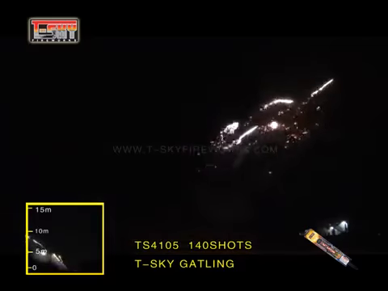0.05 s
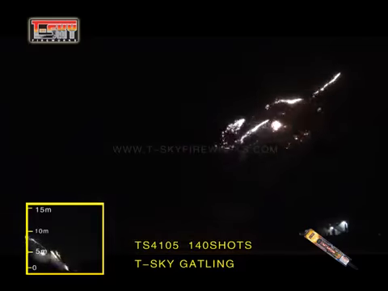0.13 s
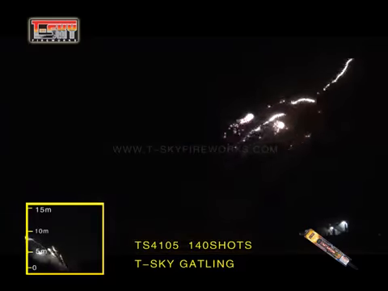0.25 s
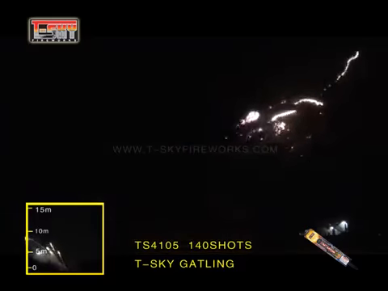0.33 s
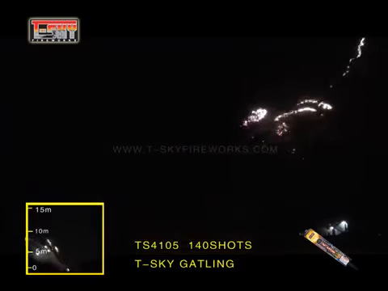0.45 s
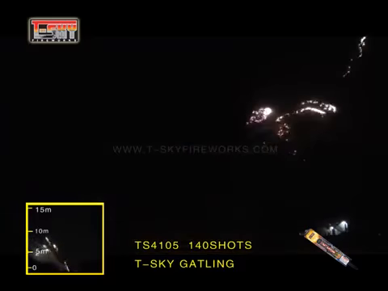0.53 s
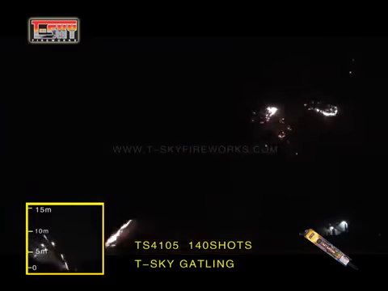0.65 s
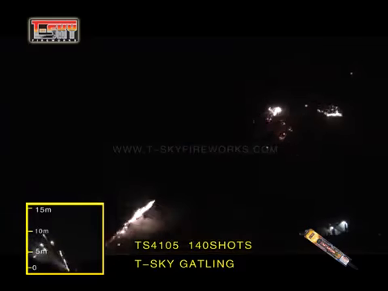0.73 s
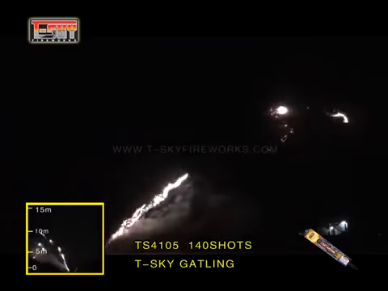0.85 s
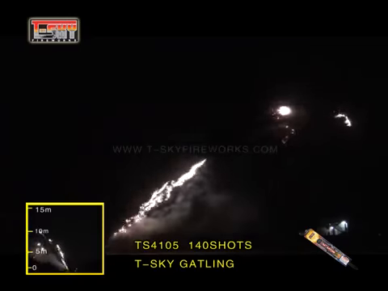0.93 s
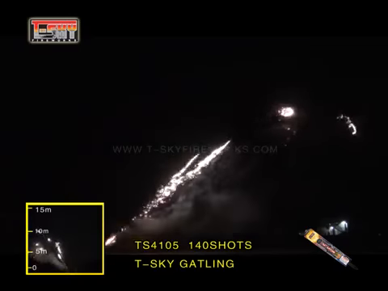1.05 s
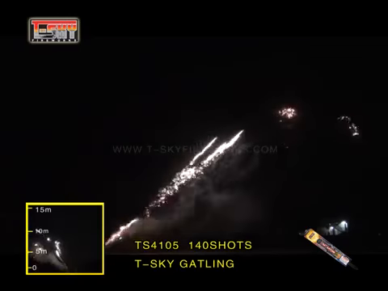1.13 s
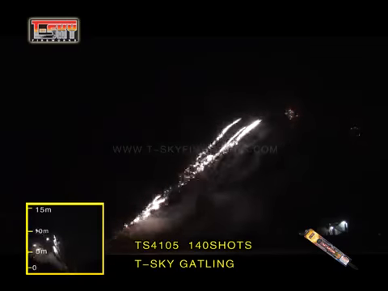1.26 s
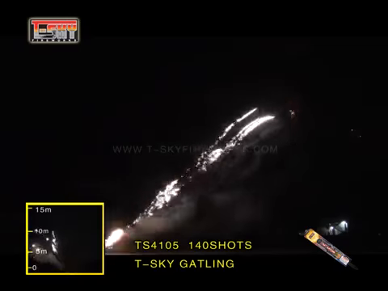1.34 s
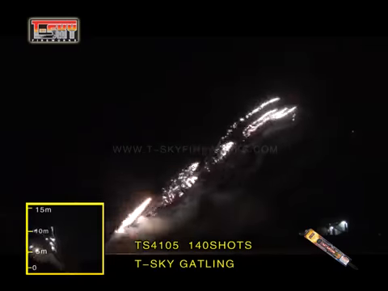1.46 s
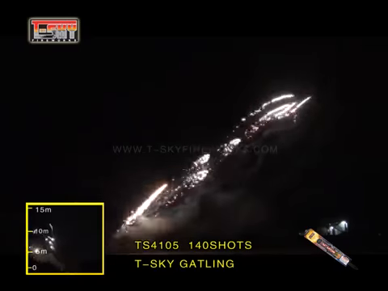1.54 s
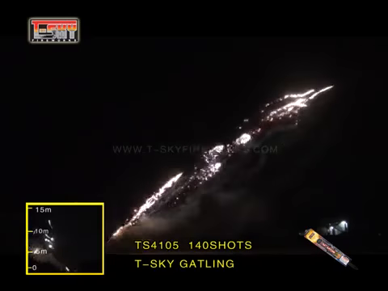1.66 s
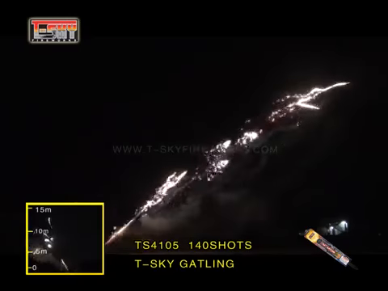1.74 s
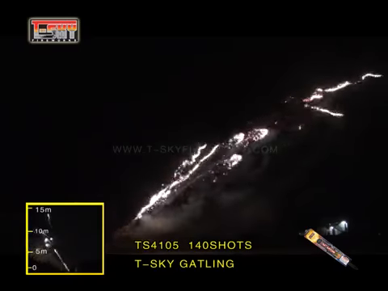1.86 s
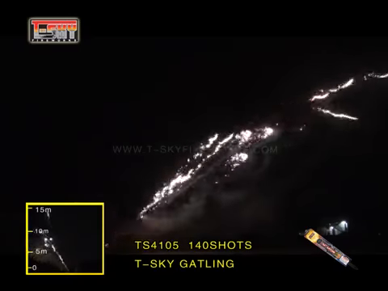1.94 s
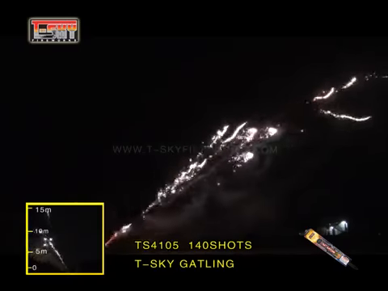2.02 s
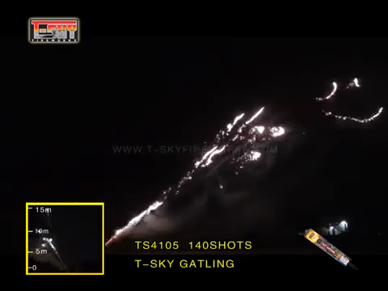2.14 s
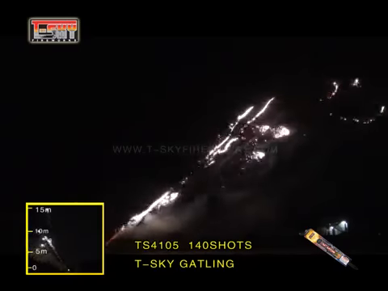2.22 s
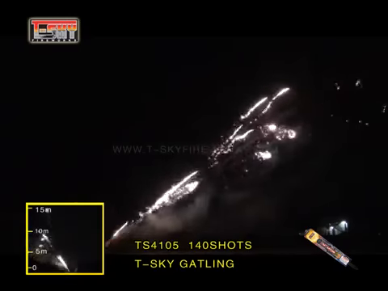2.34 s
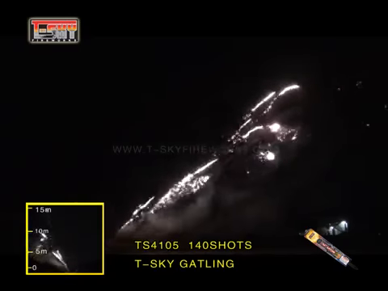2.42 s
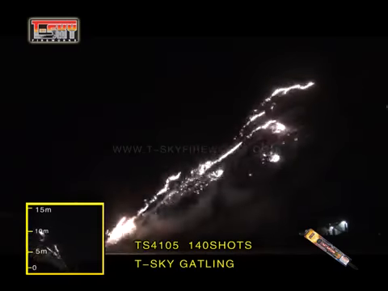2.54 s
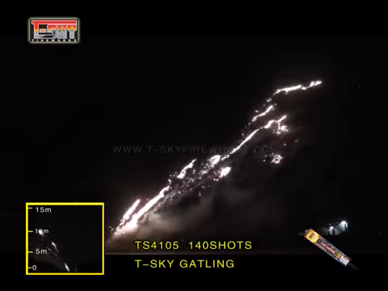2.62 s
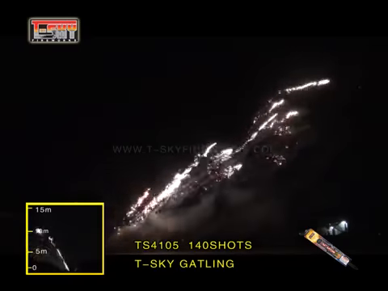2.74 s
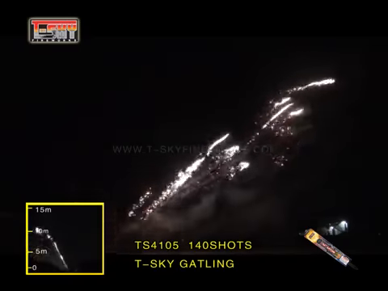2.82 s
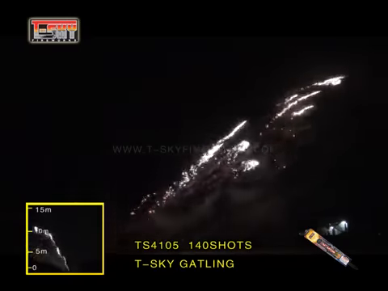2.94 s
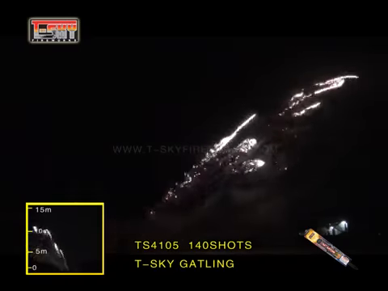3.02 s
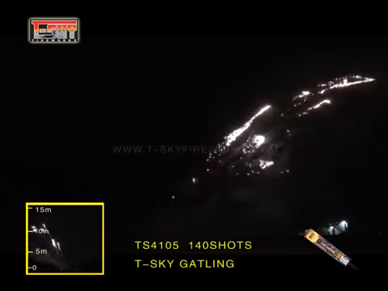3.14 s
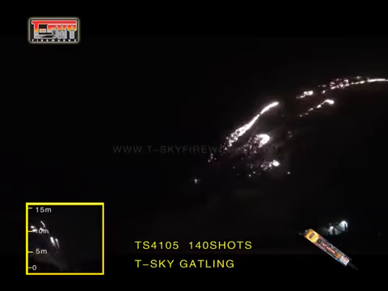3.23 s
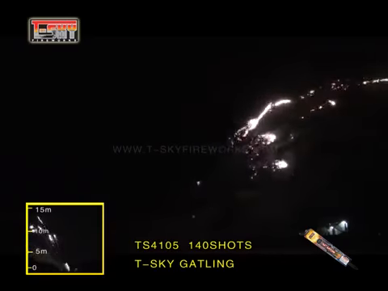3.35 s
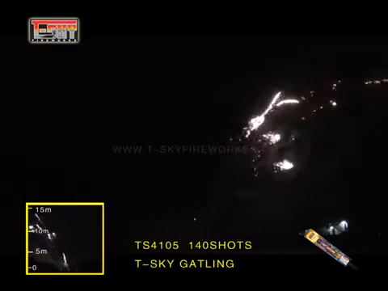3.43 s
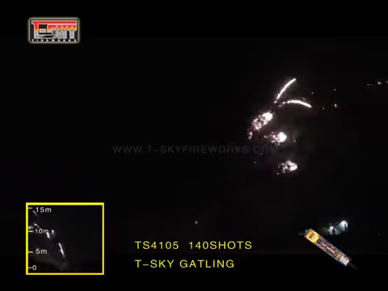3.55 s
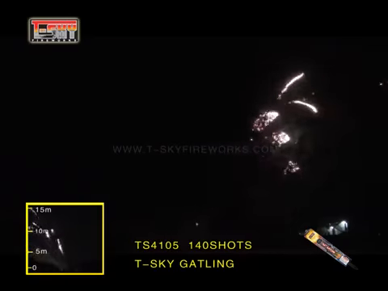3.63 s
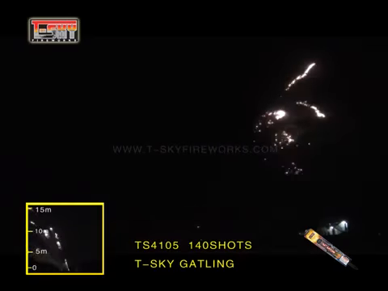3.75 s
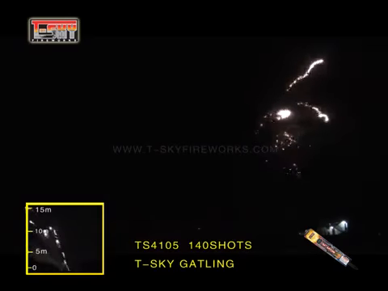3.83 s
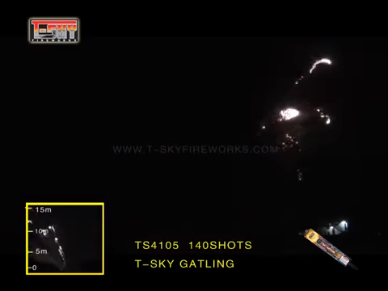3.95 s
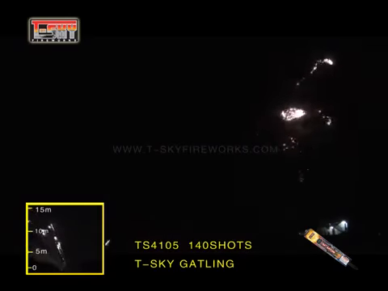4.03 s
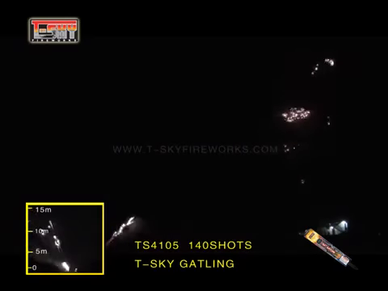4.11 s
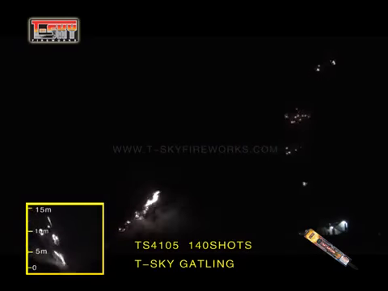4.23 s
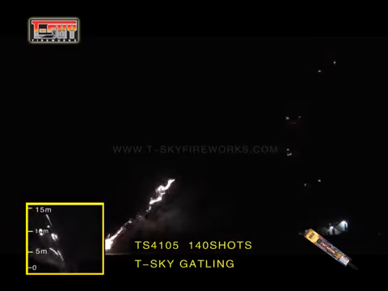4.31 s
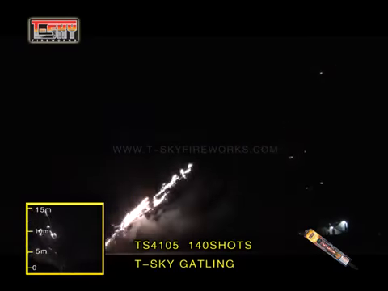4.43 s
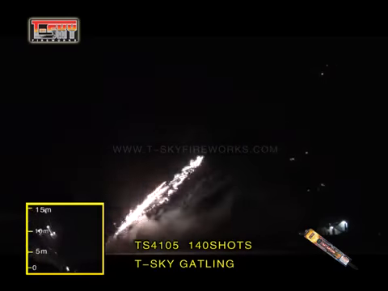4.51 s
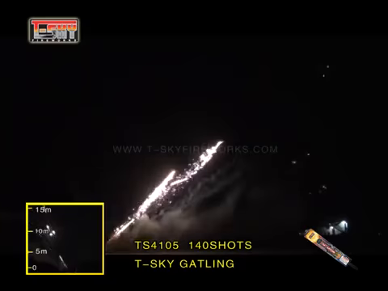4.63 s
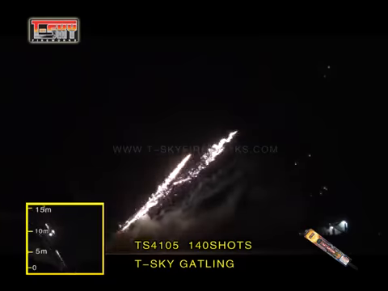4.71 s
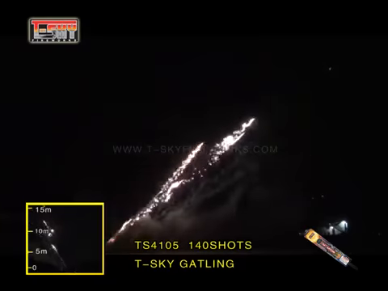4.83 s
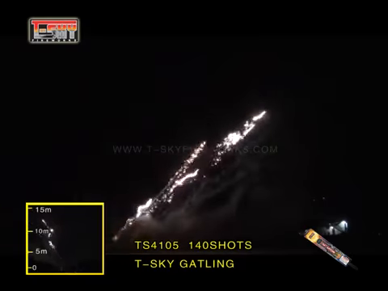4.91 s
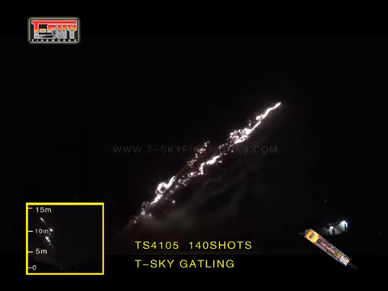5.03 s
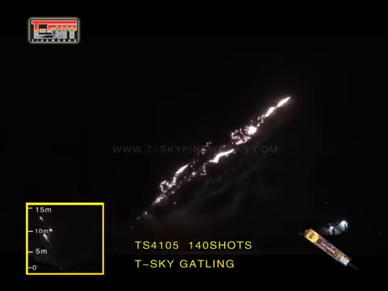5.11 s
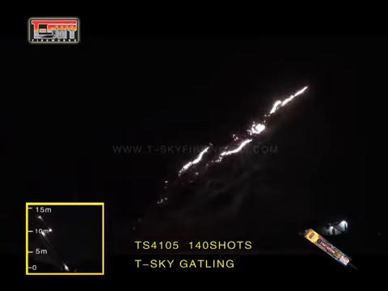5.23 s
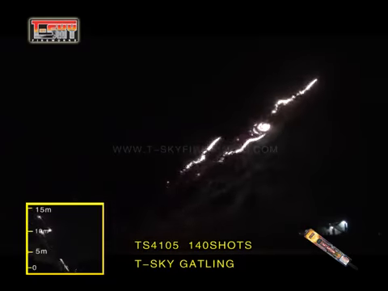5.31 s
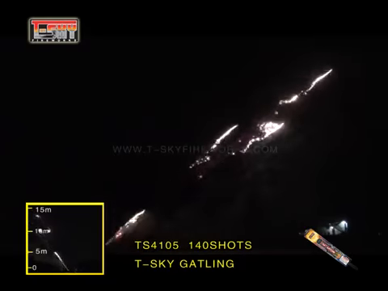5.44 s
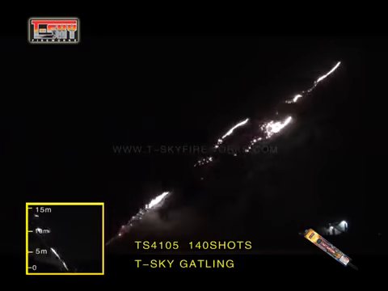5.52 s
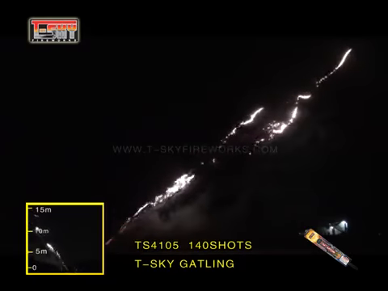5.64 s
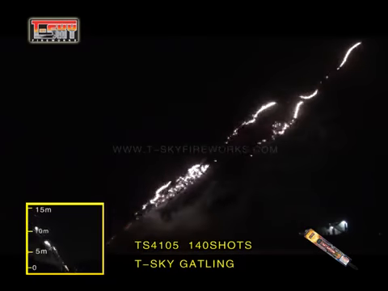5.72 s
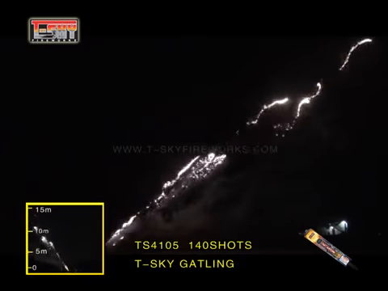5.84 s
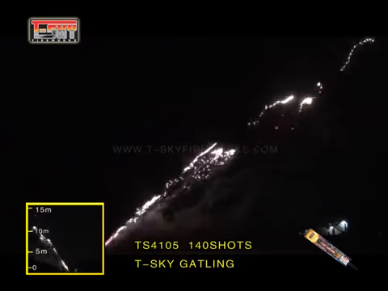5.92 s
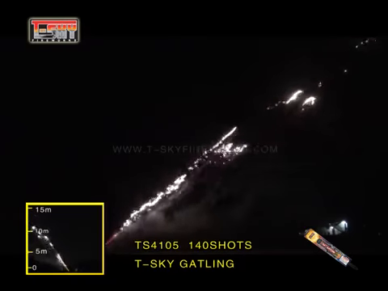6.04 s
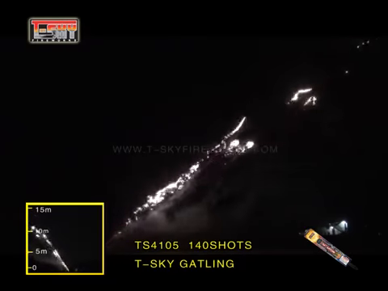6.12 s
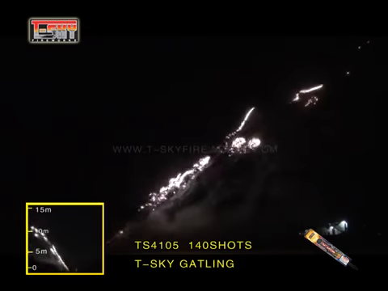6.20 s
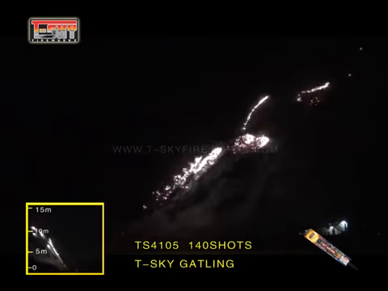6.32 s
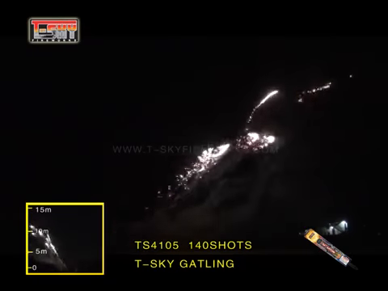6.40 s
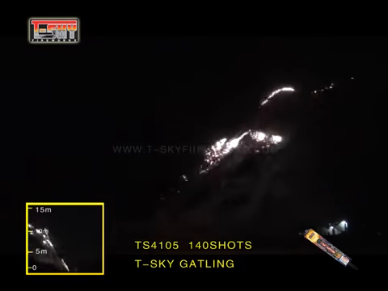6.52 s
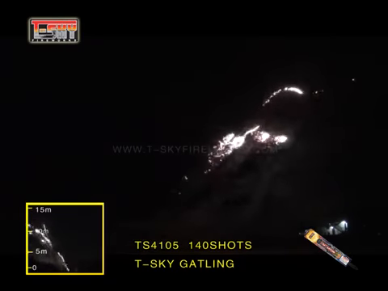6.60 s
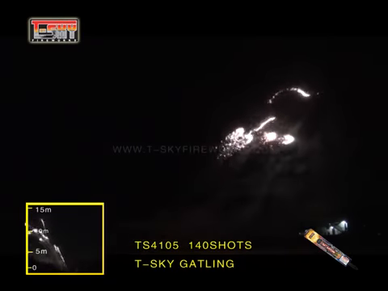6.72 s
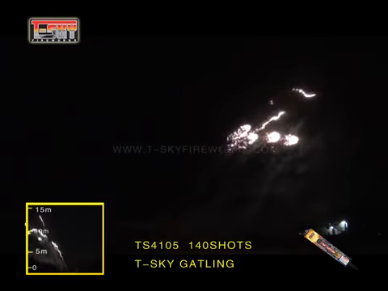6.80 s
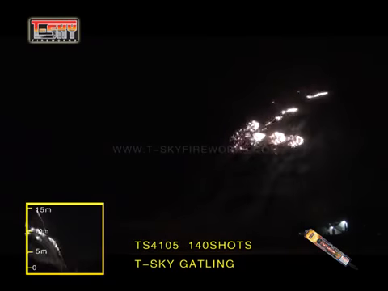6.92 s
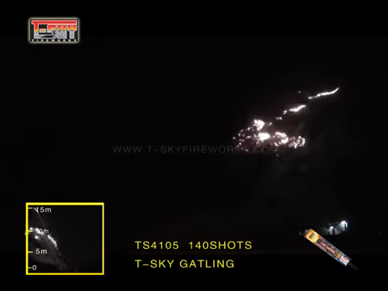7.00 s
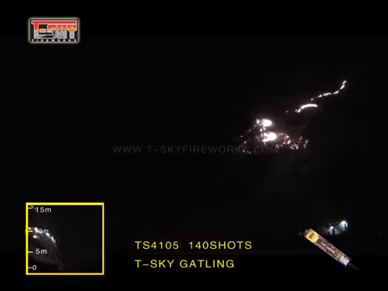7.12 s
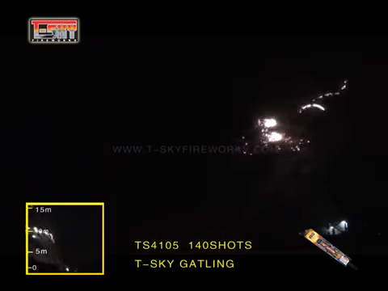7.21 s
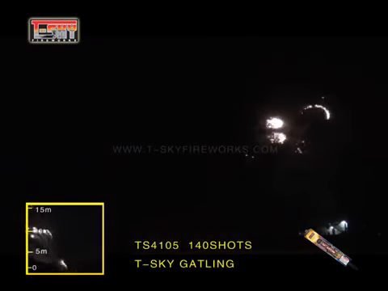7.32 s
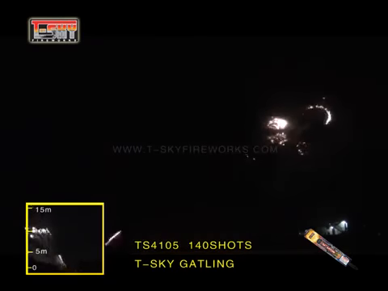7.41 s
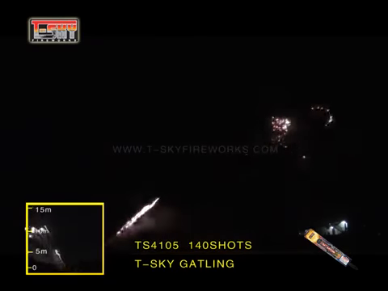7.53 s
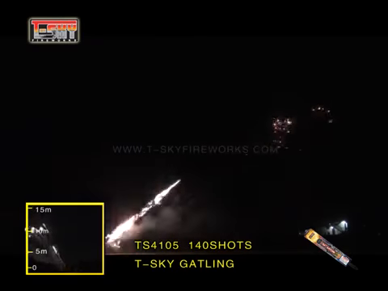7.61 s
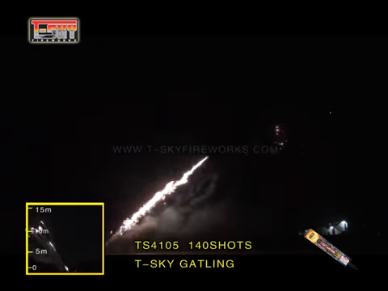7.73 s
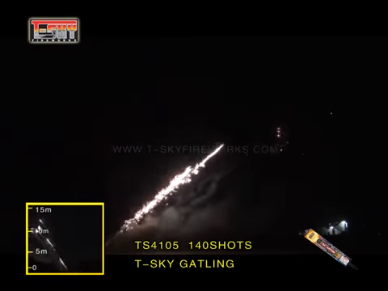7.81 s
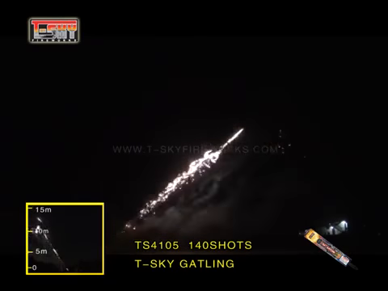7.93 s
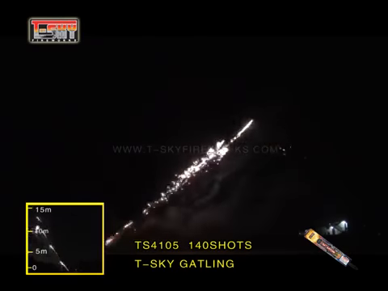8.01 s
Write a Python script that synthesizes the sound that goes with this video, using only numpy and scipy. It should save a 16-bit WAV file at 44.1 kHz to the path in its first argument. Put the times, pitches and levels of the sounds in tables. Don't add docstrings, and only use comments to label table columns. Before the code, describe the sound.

Whistling stars already in the air drift and fall in pitch, then a tight volley of loud cracks launches fresh ones that rush up and sink, each with a rougher twin. Bursts of pops come and go, with a lull around three to four seconds and another near seven, when only whistles remain. Light sparks, fading ground rumble and very faint wind surround a close, slightly dull, limited small microphone in an open field.

```python
import sys
import numpy as np
from scipy import signal
from scipy.fft import rfft, irfft, next_fast_len
from scipy.io import wavfile
from scipy.ndimage import uniform_filter1d, minimum_filter1d, map_coordinates

SR = 44100
rng = np.random.default_rng(int(sys.argv[2]) if len(sys.argv) > 2 else 0)


def gain_from_db(level_db):
    decades = np.asarray(level_db, float) / 20
    return 10 ** decades


def materialize(psi):
    bounded = np.clip(np.atleast_2d(psi).T, -1, 1)
    quanta = np.round(bounded * 32767).astype(np.int16)
    wavfile.write(sys.argv[1], SR, quanta)


N = 355442
TOP_HZ = 14950


def unit(x):
    return x / np.sqrt(np.mean(x ** 2) + 1e-20)


def along(points, hz):
    f, v = np.transpose(points)
    return np.interp(np.log(hz + 1), np.log(f + 1), v)


def wobble(rate, size, order=3):
    knots = rng.standard_normal(int(size * rate / SR) + 4)
    return map_coordinates(knots, [np.arange(size) * rate / SR], order=order)


def filtered(x, response):
    m = next_fast_len(N + SR // 2)
    return irfft(rfft(x, m) * response(np.fft.rfftfreq(m, 1 / SR)), m)[..., :N]


# (frequency [Hz], phase [rad])
PORT_LEAD = [(30, -.6), (120, -1.4), (400, -1.5), (1100, -1.0), (2300, -.3), (14000, -.3)]


def ports(x):
    side = np.array([[1], [-1]])
    both = filtered(x[0], lambda hz: np.exp(.5j * along(PORT_LEAD, hz) * side))
    both = both * gain_from_db([[-.8], [.8]])
    return both + gain_from_db(-17) * x[1] * side


def air():
    wind = filtered(rng.standard_normal((2, N)), lambda hz: 1 / (1 + (hz / 45) ** 2))
    return gain_from_db([[-62], [-69]]) * unit(wind)


# (time [s], peak [dB], t60 [s])
BOOMS = [(0, -42.5, 6.3), (.2, -37, 1.1), (0.747, -4.5, 0.071), (.768, -23, 0.28), (0.811, -23, 0.44),
         (.843, -22, 0.24), (0.875, -20.5, 0.3), (.92, -34, 3.8), (1.079, -31, 0.14), (1.162, -32, 0.14),
         (1.7, -44, 2.9), (2.2, -47.5, 8.4), (2.6, -50.5, 3.8), (3.3, -54.5, 18), (3.901, -52.5, 9.7),
         (4.421, -48, 1.5), (4.47, -37, 0.78), (5.352, -59, 2.7), (5.55, -69, 1.8), (6.1, -56, 1.1),
         (7.6, -53.5, 3.8), (7.73, -46, 1)]


def rolling():
    attack_s, quiet_db = 0.0014, -69
    t = np.arange(0, N, 64) / SR
    power = gain_from_db(quiet_db) ** 2
    for s, db, t60 in BOOMS:
        since = np.maximum(t - s, 0)
        boom = gain_from_db(db - 60 * since / t60) * np.minimum(since / attack_s, 1)
        power = power + boom ** 2
    return np.interp(np.arange(N) / SR, t, np.sqrt(power))


# (frequency [Hz], level [dB per Hz])
RUMBLE_TONE = [(15, -58.5), (25, -35), (110, -7), (219, -0.5), (361, -8.5), (500, -18), (800, -30),
               (1800, -58)]


def rumble():
    low = filtered(rng.standard_normal((2, N)), lambda hz: gain_from_db(along(RUMBLE_TONE, hz)))
    lumps = gain_from_db(2.0 * wobble(30, size=N, order=1))
    return rolling() * ports(unit(unit(low) * lumps))


# (frequency [Hz], level [dB per Hz])
SPARK_TONE = [(150, -73), (400, -3), (1200, 2), (1650, -1.5), (2200, 2), (3000, 5.5), (7000, 2.5),
              (14000, 1.5)]
# (time [s], strength [dB])
SHOWER = [(0, -49), (.35, -51.5), (.73, -49), (.755, -47), (.785, -44), (0.8, -40.5), (.93, -44.5),
          (1.0, -45.5), (1.4, -47.5), (1.5, -40.5), (1.95, -42), (2.62, -50.5), (2.69, -40), (2.85, -51),
          (3.78, -50.5), (3.84, -55), (3.981, -53.5), (4.03, -54), (4.4, -53.5), (4.548, -44), (4.67, -45),
          (4.75, -50), (5.098, -53), (5.4, -50.5), (7, -52), (7.45, -53.5), (7.62, -47.5), (7.68, -56),
          (7.758, -45), (8.06, -48)]


def sparks(flame):
    strength_db = np.interp(np.arange(N) / SR, *np.transpose(SHOWER))
    struck = rng.random((2, N)) < 400 / SR
    size_db = 9.0 * rng.standard_exponential((2, N)).clip(0, 3)
    clicks = struck * gain_from_db(size_db) * rng.standard_normal((2, N))
    busy = np.clip((strength_db + 52.0) / 14, 0, 1)
    hiss = rng.standard_normal((2, N))
    crackle = filtered(hiss + busy * unit(clicks), lambda hz: gain_from_db(along(SPARK_TONE, hz)))
    crackle = unit(crackle) * gain_from_db(2.4 * wobble(20, size=N))
    return gain_from_db(strength_db + 13.5) * flame * ports(crackle)


# (time [s], peak [dB], gap [s], second peak [dB])
DOUBLES = [
    (0.736, -20.5, 0.0087, -13),
    (0.793, -12, 0.0077, -20),
    (.908, -14, 0.016, -17.5),
    (1.463, -31, 0.0075, -16.5),
    (1.718, -16, 0.0069, -18),
    (1.84, -18, 0.011, -16.5),
    (1.902, -25, 0.028, -28),
    (2.667, -13.5, 0.015, -17.5),
    (4.464, -16, 0.006, -17),
    (7.719, -20.5, 0.0054, -16.5),
]
# (time [s], peak [dB])
SINGLES = [(.829, -25), (.841, -27), (.877, -25), (1.189, -20.5), (1.256, -21), (1.563, -25), (1.647, -27),
           (2.05, -30), (2.145, -22.5), (2.223, -19.5), (2.293, -23), (2.322, -31), (2.494, -22),
           (2.552, -30), (2.635, -19.5), (2.699, -19.5), (4.212, -21), (4.5, -17.5), (4.535, -22.5),
           (4.618, -16.5), (4.751, -17.5), (4.95, -19), (5.526, -18.5), (5.717, -21.5), (5.949, -18),
           (6.06, -19.5), (6.098, -21), (7.542, -17), (7.584, -19), (7.832, -17)]


def launches():
    pops_heard = list(SINGLES)
    for s, db, gap, again_db in DOUBLES:
        pops_heard += [(s, db), (s + gap, again_db)]
    return pops_heard


# (frequency [Hz], width [Hz], level [dB])
TUBE = [(260, 980, 13), (686, 430, 19), (1275, 170, 5)]


def muzzle(hz):
    ring = 1
    for k, (centre, width, db) in enumerate(TUBE):
        band = 1j * hz * width
        ring = ring + (-1) ** k * gain_from_db(db) * band / (centre * centre - hz * hz + band)
    return ring / (1 + 1j * hz / 4500) ** 2 * 1j * hz / (120 + 1j * hz)


def pops():
    blows, puffs = np.zeros(N + SR), np.zeros((2, N + SR))
    t = np.arange(SR // 10) / SR
    for s, db in launches():
        i = round((s + 0.00202) * SR)
        blows[i:i + 5] -= gain_from_db(db + 7.5) * np.hanning(5)
        blows[i + 5:i + 12] += gain_from_db(db + 8.0) * np.hanning(7)
        blows[i + round(rng.uniform(60, 100))] += gain_from_db(db + 8.5)
        puffs[:, i:i + len(t)] += gain_from_db(db - 13.0 - 60 * t / 0.047) * rng.standard_normal((2, len(t)))
    bursts = np.array([blows + puffs[0], puffs[1]])[:, :N]
    return ports(filtered(bursts, muzzle))


def duck():
    t, db = np.arange(N) / SR, np.zeros(N)
    for s, level in launches():
        near = slice(round((s - .01) * SR), round((s + .08) * SR))
        u = t[near] - s
        depth_db = max(level + 21, 0) * 1.3
        db[near] -= depth_db * np.clip(u / .002 + 1, 0, 1) * np.exp(-np.maximum(u - .005, 0) / .008)
    return gain_from_db(db)


def flight(row, bend, fresh=False, tumble_db=0, flick=0):
    s, length, first_hz, last_hz, db = row
    fade_in_s, fade_out_s = .035, 0.017
    rush_s = .12 if fresh else 0
    t = np.arange(max(s - rush_s - fade_in_s, 0), s + length + fade_out_s, 1 / SR)
    done = np.clip((t - s) / length, 0, 1)
    early = np.clip((s - t) / rush_s, 0, 1) if fresh else np.zeros(len(t))
    hz = (first_hz + (last_hz - first_hz) * done ** bend) * (1 - .16 * early ** 1.4)
    high = np.clip((hz - 4100) / (4900 - 4100), 0, 1)
    beat = tumble_db * high * np.cos(2 * np.pi * 17.5 * (t - s))
    beat = beat + 7 * np.minimum(8 * early, 1) * np.cos(2 * np.pi * 26 * (t - s))
    level = db - 2.5 * (2 * done - 1) ** 2 - 14 * early ** 1.5 + beat
    rise, fall = (t - s + rush_s) / fade_in_s, (s + length - t) / fade_out_s
    fade = np.clip(np.minimum(rise, fall) + 1, 0, 1) ** 2
    ragged = 0.316 * early + flick * done + 0.42 * np.exp((t - t[-1]) / 0.051)
    twin_db = -3 - 12 * done - 5 * np.minimum(5 * early, 1) if fresh else None
    return t, hz * (1 + .004 * wobble(9, size=len(t), order=1)), level, fade, ragged, twin_db


# (time [s], length [s], first pitch [Hz], last pitch [Hz], level [dB])
BURNOUT = [(2.56, 0.015, 3340, 3100, -26), (3.39, 0.037, 3330, 3100, -29), (4.3, 0.008, 3250, 3190, -21.5),
           (4.322, 0.0042, 3183, 3260, -21), (3.655, 0.022, 5040, 5000, -32),
           (4.31, 0.013, 3370, 3740, -26.5), (4.32, 0.015, 4500, 4500, -44),
           (7.352, 0.0068, 3220, 3010, -36), (7.44, 0.0164, 5090, 5600, -28),
           (7.595, 0.015, 4750, 4850, -36), (7.64, 0.03, 4060, 3750, -35), (6.15, 0.0089, 3120, 3050, -33)]


def burning_out():
    return [flight(row, bend=3.43, flick=0.38) for row in BURNOUT]


# (time [s], length [s], first pitch [Hz], last
# pitch [Hz], level [dB])
CURLS = [(.18, 0.028, 3620, 3860, -27), (.26, 0.036, 3750, 3750, -33), (.3, 0.15, 4850, 4950, -36.5),
         (.3, 0.028, 4100, 4220, -37), (.31, 0.045, 4420, 4360, -36), (.385, .055, 4660, 4620, -24.5),
         (.5, 0.15, 4380, 4590, -24.5), (.88, 0.11, 4920, 4850, -36), (.65, 0.097, 3750, 3820, -24),
         (1.89, 0.035, 3620, 3940, -45), (1.92, 0.13, 4060, 4200, -27), (2.11, 0.075, 3310, 3470, -31),
         (2.12, 0.1, 4350, 4560, -28), (2.31, 0.15, 3730, 3800, -28.5), (2.85, .04, 3810, 4100, -31),
         (2.91, 0.085, 3940, 4020, -27), (2.96, 0.07, 3630, 3650, -28.5),
         (3.16, 0.12, 4820, 4930, -28.5), (3.25, 0.16, 3854, 4105, -21.5),
         (3.32, 0.081, 4320, 4470, -31), (3.42, 0.26, 4680, 5330, -34.5),
         (3.53, 0.12, 3940, 4250, -23), (3.52, 0.25, 3460, 3960, -25.5),
         (3.83, 0.098, 4320, 4600, -34), (3.95, 0.21, 4180, 4850, -32),
         (4.13, 0.14, 4670, 4780, -38.5),
         (5.148, 0.1, 4310, 4450, -25), (5.431, .095, 3960, 4280, -26),
             (5.56, 0.066, 4420, 4670, -25.5), (5.57, 0.11, 3680, 3700, -36),
             (5.69, 0.02, 3860, 3702, -22.5), (5.592, 0.064, 3970, 4170, -33),
             (5.871, 0.12, 3700, 4070, -26.5), (6.062, 0.043, 3950, 4000, -35),
             (6.14, 0.35, 3790, 4220, -30), (6.38, 0.1, 4450, 4760, -25), (6.44, .1, 4350, 4350, -25.5),
             (6.75, 0.25, 3653, 3840, -27), (6.75, 0.036, 4550, 4750, -19.5),
             (6.78, 0.069, 4350, 4500, -22), (7.06, .04, 3740, 3920, -27), (7.0, 0.095, 4290, 4580, -22.5),
             (7.144, 0.34, 4840, 5050, -29), (7.35, 0.19, 4350, 4650, -26), (7.331, 0.34, 3693, 4130, -28),
             (7.65, 0.061, 4130, 4330, -35), (7.69, 0.054, 4540, 4590, -27), (7.208, 0.17, 4240, 4300, -37),
             (7.82, 0.11, 4670, 4670, -30)]


def curling():
    return [flight(row, bend=.9, tumble_db=7) for row in CURLS]


# (time [s], length [s], first pitch [Hz], last pitch [Hz], level [dB])
SLIDES = [(0, 0.074, 3590, 3260, -27), (.06, 0.11, 3900, 3600, -28.5), (.14, 0.12, 5080, 4860, -21.5),
          (.2, 0.053, 4460, 4330, -43), (.67, 0.058, 4700, 4430, -27.5), (.77, .04, 3860, 3820, -28),
          (.82, 0.17, 3830, 3300, -38), (.92, 0.19, 4730, 4590, -25), (1.25, 0.24, 4830, 4510, -31),
          (2.67, 0.084, 5130, 5000, -22.5), (2.53, 0.076, 4700, 4740, -30),
          (2.96, .1, 4340, 4200, -30), (1.19, 0.15, 3193, 3240, -33), (1.41, 0.15, 4290, 4110, -26),
          (1.6, 0.19, 5055, 4960, -24), (1.8, 0.33, 4940, 4235, -28), (1.7, 0.18, 3820, 3670, -26),
          (1.94, 0.19, 3480, 3290, -30), (1.97, 0.18, 3930, 3640, -34), (2.19, 0.03, 3420, 3250, -28),
          (2.2, 0.065, 4070, 3830, -28.5), (2.28, 0.16, 4820, 4400, -21.5),
          (2.42, 0.1, 4900, 4340, -24.5), (2.55, 0.26, 4800, 4210, -26.5),
          (2.65, 0.11, 4240, 3920, -24), (2.72, 0.24, 3824, 3590, -25.5),
          (3.059, 0.11, 3690, 3510, -30.5), (3.2, 0.16, 3440, 3260, -28), (3.2, .12, 4560, 4270, -28.5),
              (3.401, 0.12, 4200, 3860, -20.5), (3.43, 0.1, 3880, 3480, -30),
              (3.539, 0.052, 3280, 3110, -33), (3.62, 0.17, 4080, 3870, -24.5),
              (5.119, 0.18, 4070, 3910, -50), (3.43, 0.17, 4440, 4240, -24),
              (3.65, 0.12, 4370, 4240, -21.5), (3.7, 0.16, 4153, 4145, -26),
              (3.871, 0.053, 4260, 3920, -38), (5.25, 0.17, 4650, 4210, -28.5),
              (5.44, 0.24, 4170, 3720, -21.5), (5.66, 0.19, 4154, 3760, -23), (6.0, 0.055, 3970, 3780, -29),
              (6.541, 0.11, 4160, 3775, -24.5), (6.551, 0.17, 4550, 4330, -26.5),
              (6.69, 0.054, 3790, 3720, -25.5), (6.791, 0.17, 4700, 4500, -25),
              (6.88, 0.13, 4450, 4285, -23), (7.108, 0.036, 4650, 4310, -24),
              (7.11, 0.128, 4000, 3840, -31), (7.922, 0.15, 4790, 4460, -28)]


def crossing():
    return [flight(row, bend=0.99) for row in SLIDES]


# (time [s], length [s], first pitch [Hz], last pitch [Hz], level [dB])
DRIFTS = [(0, 0.11, 5170, 4810, -21.5), (0, 0.19, 4866, 4580, -24), (.31, 0.39, 3766, 3235, -29),
          (.37, 0.34, 4100, 3640, -23), (.445, 0.045, 4420, 4400, -24.5), (.98, 0.1, 3370, 3260, -29),
          (1.32, 0.19, 4370, 3770, -29), (1.55, 0.141, 3885, 3680, -29.5),
          (1.6, 0.093, 4000, 3710, -27), (1.78, 0.16, 4210, 4020, -25.5),
          (1.44, 0.143, 4800, 4880, -41),
          (2.281, 0.072, 3670, 3440, -25.5),
    (2.36, 0.135, 3455, 3400, -25.5),
    (2.515, .03, 3480, 3400, -35),
    (2.51, 0.21, 4080, 3730, -27.5),
    (2.939, 0.36, 4900, 4130, -27.5),
    (3.032, 0.23, 4070, 3790, -25.5),
    (3.969, 0.084, 4000, 3580, -22.5),
    (4.06, 0.22, 3626, 3345, -18.5),
          (5.261, 0.14, 4280, 3944, -25),
    (5.289, 0.35, 3890, 3615, -29),
    (5.842, 0.06, 3580, 3385, -33),
    (5.939, 0.22, 3470, 3200, -38),
    (6.12, 0.27, 4790, 4310, -24),
    (7.082, 0.3, 3550, 3363, -26),
    (6.83, 0.25, 4240, 3717, -22.5),
]


def drifting():
    return [flight(row, bend=0.6) for row in DRIFTS]


# (time of top [s], sinking [s], top pitch [Hz], last pitch [Hz], level [dB])
FRESH = [(1.02, 0.38, 5300, 4300, -22.5), (1.2, 0.39, 5340, 4800, -25.5), (1.43, 0.16, 5460, 5150, -25.5),
         (1.99, 0.28, 5220, 4570, -26.5), (2.15, 0.14, 5110, 4595, -23), (2.44, 0.24, 5296, 5030, -21),
         (2.79, .14, 5186, 4785, -22.5), (2.9, 0.3, 5310, 4380, -21.5), (4.455, 0.71, 5380, 4230, -21),
         (4.79, 0.11, 5230, 4800, -26), (4.98, 0.29, 5270, 4720, -24), (5.21, 0.34, 5370, 4380, -25.5),
         (5.75, .33, 5240, 4850, -22), (5.9, 0.3, 5216, 4690, -23), (6.19, 0.55, 5344, 4520, -21.5),
         (6.32, 0.17, 5230, 4850, -27), (7.85, 0.26, 5280, 4940, -21), (7.88, 0.19, 4880, 4545, -27)]


def rising():
    return [flight(row, bend=1.2, fresh=True) for row in FRESH]


MULTIPLES = [1, .5, 1.5, 2, .25, 3, 2.5, 4]
PARTIALS_DB = [-0.5, -25, -15, -14.5, -61.5, -17.5, -21, -18]


def voice(hz, db, rough, count):
    n = len(hz)

    def jitter(rate):
        return wobble(rate, size=n, order=1)

    waver = .008 * np.minimum(rough + .2, 1.3) * jitter(40)
    waver = waver + .015 * np.minimum(rough, 2.2) ** 1.3 * jitter(230)
    turns = np.cumsum(hz * (1 + waver)) / SR
    angle = (2 * np.pi * (turns % 2)).astype(np.float32)
    spin = np.sin(2 * np.pi * (rng.uniform(15.75, 25.58) * np.arange(n) / SR + rng.random()))
    flicker = wobble(14.82, size=n + SR // 2, order=1)
    breath = (rough + .1) * (.07 * jitter(1800) + .1 * jitter(600))
    rasp_db = 7 * (np.minimum(rough, 1) - .7)
    tone = 0
    for i, (k, level) in enumerate(zip(MULTIPLES[:count], PARTIALS_DB)):
        if k * hz.min() >= TOP_HZ:
            continue
        unsteady_db = 2.7 * abs(np.log2(k) * min(k, 1)) ** .5 * flicker[i * 2500:][:n]
        chop_db = 3 * max(k - 1, 0) * spin
        strength = gain_from_db(level + unsteady_db + chop_db + (k % 1 > 0) * rasp_db)
        tone = tone + strength * (1 + breath * (1 + k)) * np.sin(k * angle)
    sputter_db = 1.47 * jitter(18.8) + 1.36 * jitter(44.8)
    sputter_db = sputter_db + 2.8 * np.minimum(rough, 1.5) * jitter(80.1)
    return gain_from_db(db + spin + sputter_db) * tone


def whistles():
    out = np.zeros((2, N + SR))
    for t, hz, db, fade, ragged, twin_db in rising() + drifting() + crossing() + curling() + burning_out():
        rough = np.clip((hz - 3000) / 2200, .4, 1)
        direct, twin = voice(hz, db + 0.5, rough + ragged, count=8), 0
        if twin_db is not None:
            twin_hz = hz * (1 - .05 * rough * (.6 + abs(wobble(22, size=len(t)))))
            twin = voice(twin_hz, db + twin_db, 1.84 * rough + ragged, count=3)
        pan = .19 * wobble(2.5, size=len(t), order=1) - .07
        left = direct * (1 + pan) + twin * (1 - pan)
        right = direct * (1 - pan) + twin * (1 + pan)
        out[:, round(t[0] * SR):][:, :len(t)] += fade * np.array([left, right])
    return out[:, :N]


def field(x):
    t = np.arange(SR // 4) / SR
    tail = rng.standard_normal((2, len(t))) * gain_from_db(-60 * t / .12) * (t > .006)
    tail = tail + 0.19 * tail[::-1]
    return signal.fftconvolve(x, tail / np.linalg.norm(tail[0]), axes=1)[:, :N]


def scene():
    stars = whistles()
    stars = (stars + gain_from_db(-12) * field(stars)) * duck()
    burning = np.sqrt(abs(uniform_filter1d(unit(stars)[0] ** 2, size=1500)) + 0.004)
    flame = burning ** 0.25
    return stars + pops() + rumble() + sparks(flame) + air()


def roll_off(x):
    return signal.sosfilt(signal.butter(12, 14920, fs=SR, output="sos"), x)


def record(dry):
    tone = [(6000, 4.0), (10000, -2), (15000, -19.0)]  # (frequency [Hz], level [dB])
    colour = filtered(dry, lambda hz: gain_from_db(along(tone, hz)) * (hz < TOP_HZ))
    need = np.minimum(1, .47 / (abs(colour).max(axis=0) + 1e-9))
    gain = uniform_filter1d(minimum_filter1d(need, size=301), size=201)
    return roll_off(colour * gain)


dry = scene()
out = record(dry)
materialize(out)
```